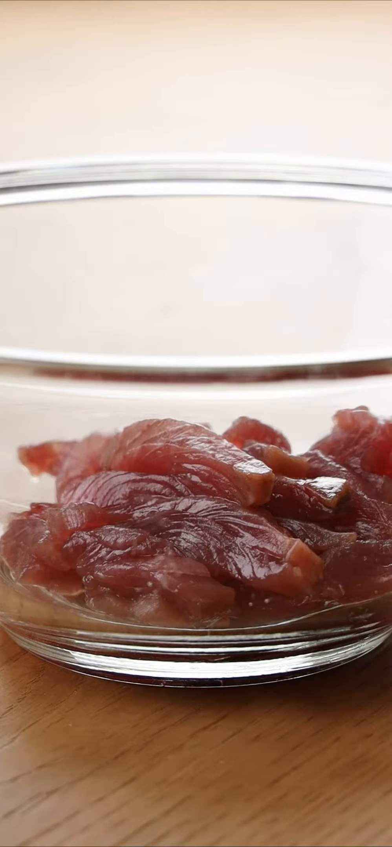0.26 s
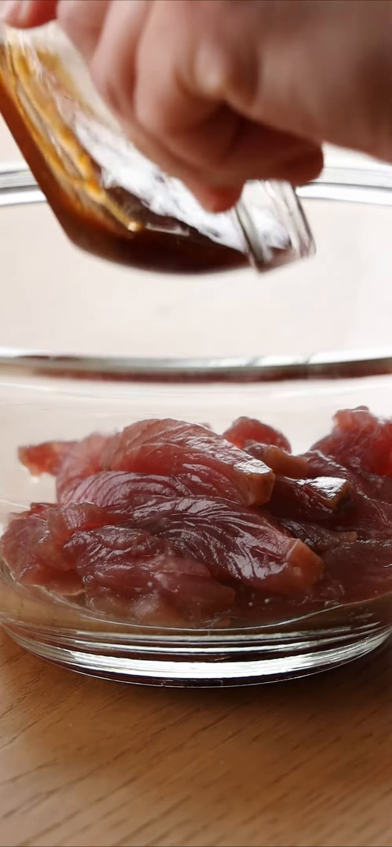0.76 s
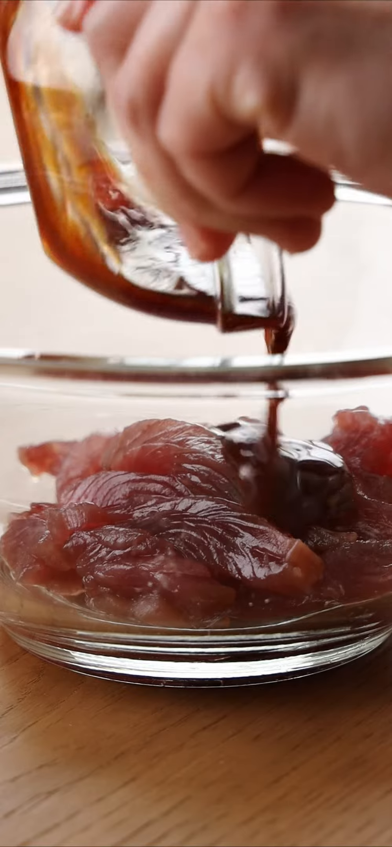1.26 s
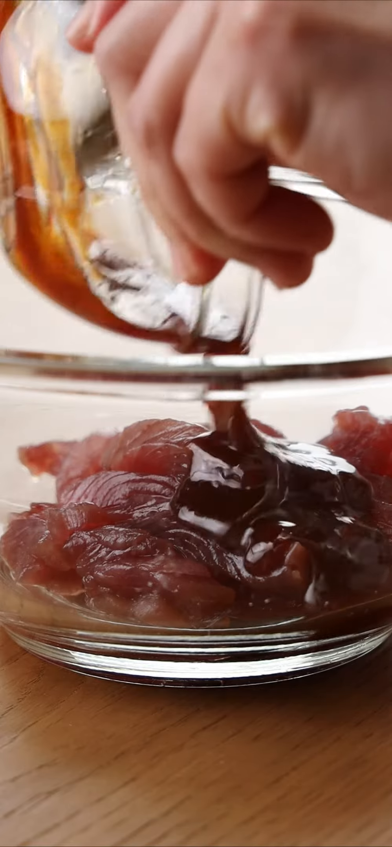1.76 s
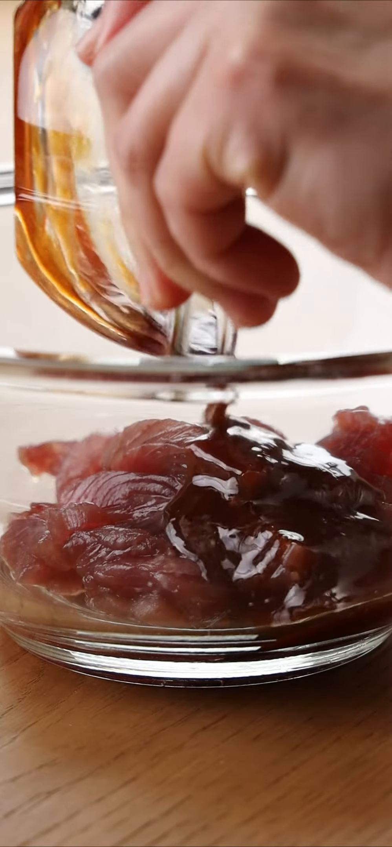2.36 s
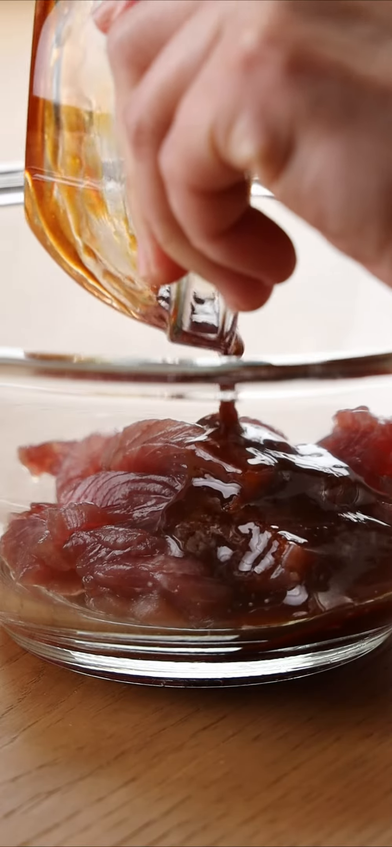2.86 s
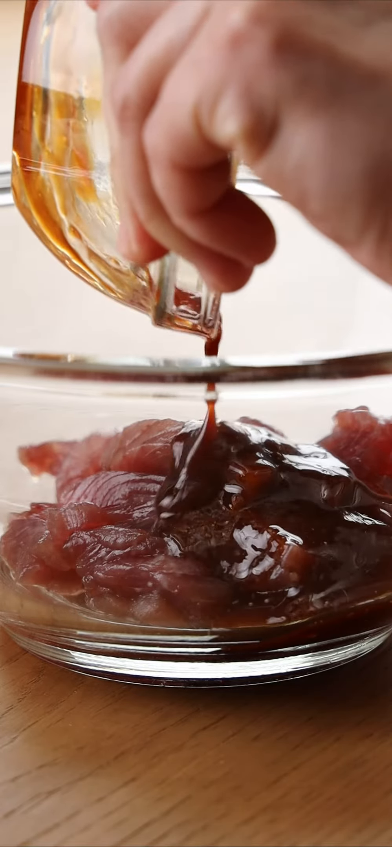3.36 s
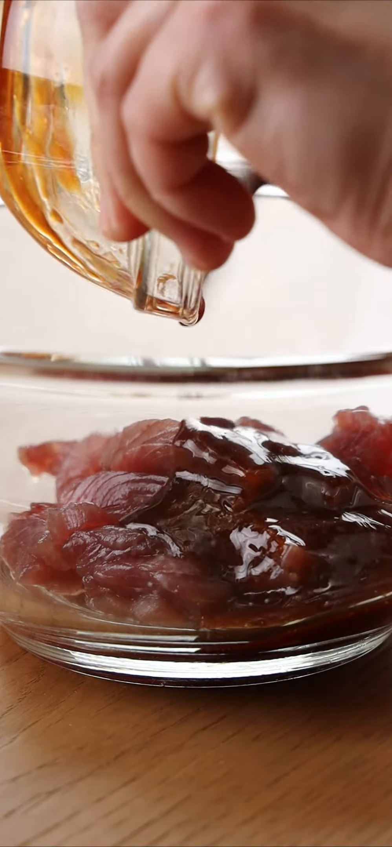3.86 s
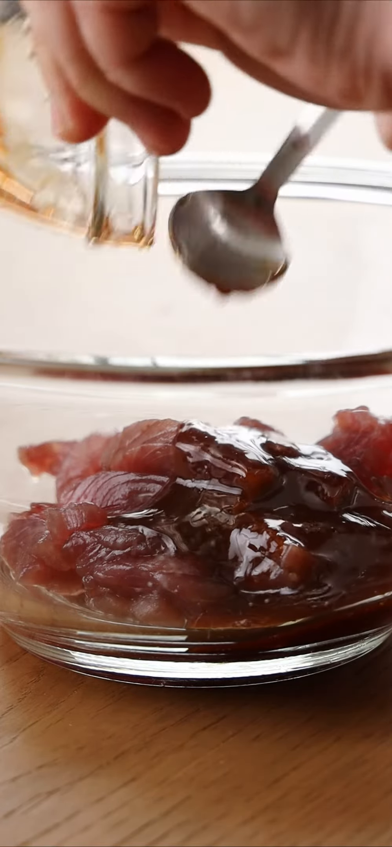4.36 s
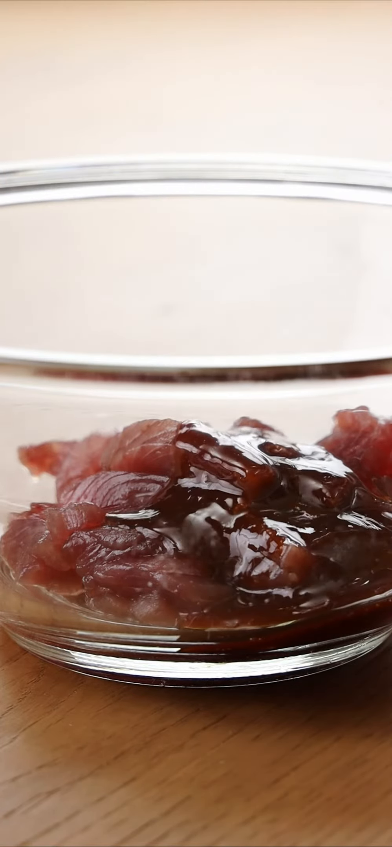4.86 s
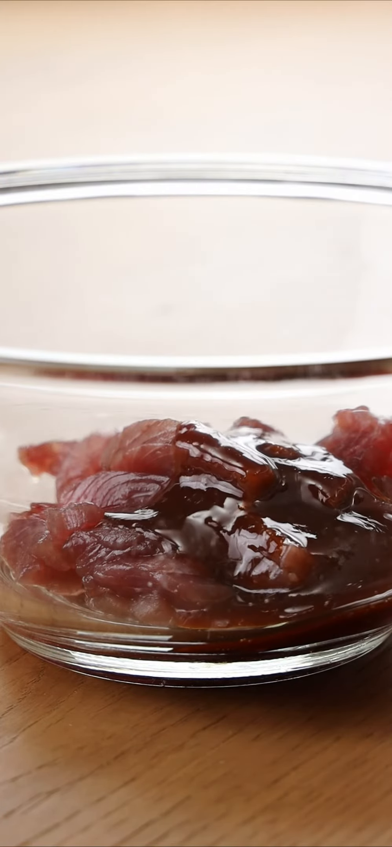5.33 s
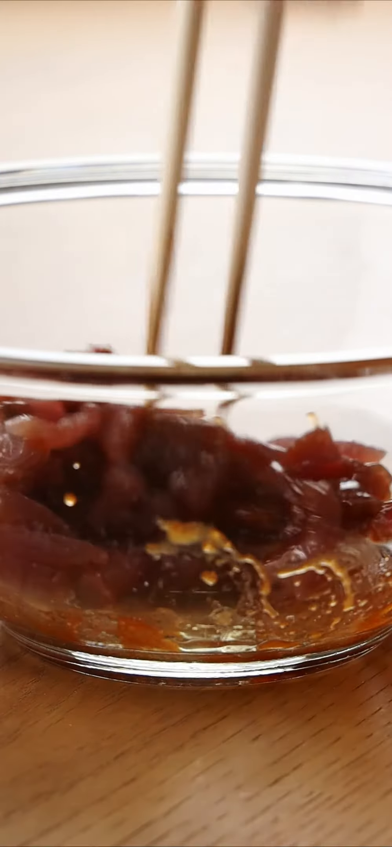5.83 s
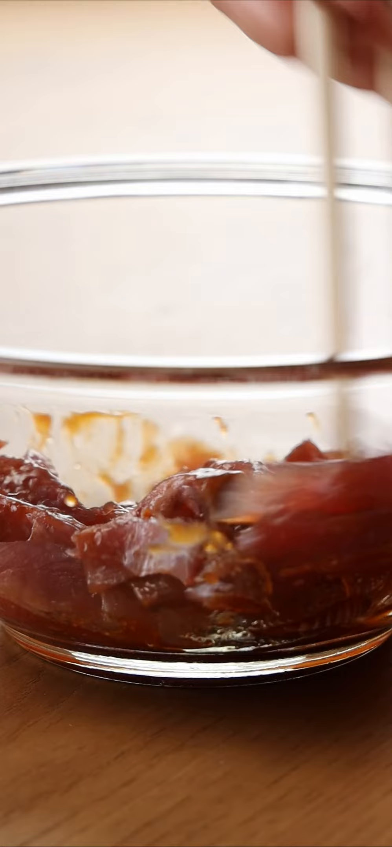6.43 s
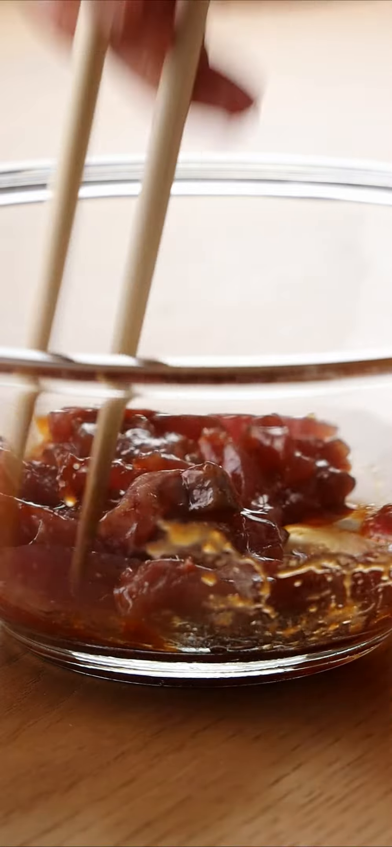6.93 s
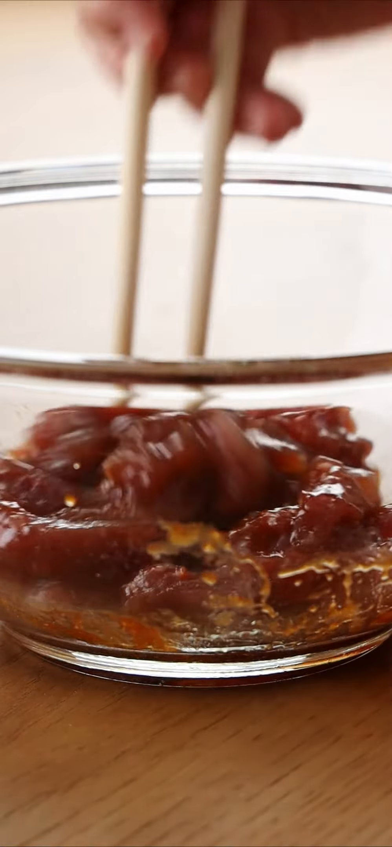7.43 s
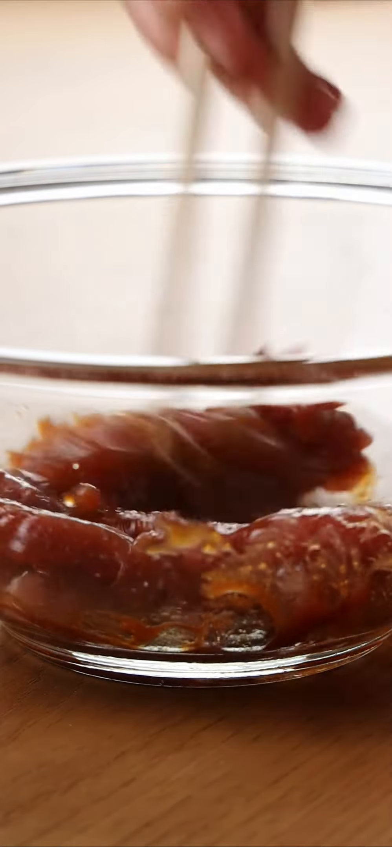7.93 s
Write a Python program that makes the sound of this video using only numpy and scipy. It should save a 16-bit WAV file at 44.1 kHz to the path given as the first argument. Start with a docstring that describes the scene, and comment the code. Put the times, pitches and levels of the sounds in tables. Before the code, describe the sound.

Metal spoon ticks and scrapes inside a small glass cup, clinks brightly on its lip, then chopsticks stir wet, sticky meat in a quiet kitchen.

```python
"""A steel spoon scrapes sauce out of a small glass cup over a glass bowl of raw meat: light ticks inside the
cup, hard clinks on its lip, a squeak and a last rattle, all built from decaying modes and a noise crack.
Chopsticks then stir the meat: the same recipe taps the bowl, and short decaying sines make the wet pops.
The microphone is close; a quiet kitchen answers with decaying noise, over steady ventilation noise and hum."""
import sys
import numpy as np
from scipy import signal
from scipy.fft import rfft, irfft, next_fast_len
from scipy.io import wavfile
from scipy.ndimage import uniform_filter1d, map_coordinates

SR = 44100
rng = np.random.default_rng(int(sys.argv[2]) if len(sys.argv) > 2 else 0)


def waveform_to_disk(signal):
    """Save audio, clipped to [-1, 1], as 16-bit WAV at the path in sys.argv[1]."""
    frames = np.transpose(np.atleast_2d(signal))
    scaled = np.clip(frames, -1, 1) * 32767
    samples = np.round(scaled).astype(np.int16)
    wavfile.write(sys.argv[1], SR, samples)


N = 361179  # length in samples

# Steady moving air. Each row: frequency in Hz, relative spectrum level in dB.
AIR_SPECTRUM = [(18, -69), (30, -36.5), (131, -15.5), (204, -9.5), (239, -10.5), (266, -3), (319, -10),
                (404, -3.5), (1160, -5), (1630, -18), (2010, -17.5), (2680, -19.5), (5900, -33),
                (12300, -42.5), (16000, -56)]
# Motor hum and whine. Each row: frequency in Hz, mean level in dB.
MOTOR_LINES = [(85, -89.5), (136, -81.5), (277, -79), (404, -90), (614, -72.5), (711, -76), (2024, -83.5),
               (3370, -84)]
# Spoon inside the cup. Each row: start in seconds, level in dB, hardness in dB, favoured ring in Hz.
CUP_TICKS = [(0.2821, -38.5, -5.5, 3330), (0.6201, -34, 0, 5400), (0.7092, -51, -16, 3160),
             (0.8738, -36.5, 1.5, 5000), (0.9954, -43.5, -22, 3750), (1.1034, -37.5, 2, 5100),
             (1.2602, -57, -14, 2540), (1.3327, -42, -11, 2540), (1.3551, -32.5, -9, 3420),
             (1.4607, -34, -4, 3270), (1.5395, -30, -7, 1620), (1.6866, -37.5, -8.5, 1630),
             (1.8049, -42, -16, 3100), (2.046, -35.5, 4, 2830), (2.165, -38.5, -5, 2470),
             (2.5339, -36.5, 8.5, 5230), (4.9063, -35, 9, 5800), (4.925, -48, -5, 2300)]
# Dull handling bumps. Each row: start in seconds, length in seconds, pitch in Hz, level in dB.
HANDLING_BUMPS = [(2.45, 0.067, 300, -59), (4.117, 0.14, 232, -64.5)]
# Spoon on the cup's lip. Each row: start in seconds, level in dB, hardness in dB, favoured ring in Hz.
LIP_CLINKS = [(2.7434, -35, -5, 1820), (3.0105, -29.5, -8.5, 4000), (3.0247, -48, 2, 3770),
              (3.0873, -19.5, -4.5, 3790), (3.2301, -23, 1.5, 3930), (3.2877, -17, -2.5, 3780),
              (3.4362, -28, 2, 4490), (3.4829, -25.5, 2, 3650), (3.6939, -24, 6.5, 4300),
              (3.7042, -25, 0.5, 4130), (3.8122, -40, -8, 4050), (3.8909, -20, 1, 3890),
              (4.3082, -27, 2.5, 4280), (4.4983, -39.5, -2, 2310)]
# Spoon ringing freely once let go. Each row: frequency in Hz, relative level in dB, 60 dB decay in seconds.
LOOSE_MODES = [(6272, -59, .5), (6923, -57, .33), (7267, -61, .3), (10180, -68, .35), (12560, -65, .32),
               (13220, -58, .2), (15700, -57, .09)]
# Short dry scrapes. Each row: start in seconds, length in seconds, drive level in dB before colouring.
DRY_SCRAPES = [(5.589, 0.029, -60), (5.626, 0.013, -42.5), (5.633, 0.018, -52.5)]
# Chopsticks on the bowl. Each row: start in seconds, level in dB, hardness in dB, favoured ring in Hz.
BOWL_TAPS = [(5.7126, -62, -23.5, 780), (6.0526, -50.5, 4, 5300), (6.5274, -55.5, -3, 2013),
             (7.0111, -51.5, -4, 2700), (7.3876, -49.5, 3, 5200), (7.3935, -47, 4, 3260),
             (7.4195, -52, 2, 3300)]
# The loudest films of sauce snapping. Each row: start in seconds, level in dB, pitch in Hz.
SAUCE_POPS = [(5.8255, -47, 1540), (5.939, -48, 2200), (6.2273, -31.5, 3280), (6.2345, -39.5, 2060),
              (6.284, -42.5, 4370), (6.4084, -54, 5160), (6.6662, -42, 4500), (6.6727, -36, 3515),
              (6.6924, -43, 4760), (6.7117, -37, 3480), (6.753, -40, 2950), (7.1729, -46, 1540),
              (7.185, -41.5, 4560), (7.263, -46.5, 2530), (7.4914, -35.5, 2830), (7.507, -39, 4540),
              (7.533, -33.5, 3220), (7.582, -43, 3430), (7.6177, -44, 5600), (7.7444, -47, 3370),
              (7.8273, -40.5, 2800), (7.913, -41, 2280), (7.9731, -37.5, 4470), (7.983, -43, 2460),
              (8.0185, -38.5, 2400)]
# Chopstick strokes through the meat. Each row: middle in seconds, crackle level in dB.
MEAT_STROKES = [(5.88, -59), (6.249, -54), (6.72, -52), (7.2, -64), (7.6, -49), (7.94, -50.5)]

# Modes of the spoon pressed into the cup, the hand-held cup and the loaded bowl.
# Each row: frequency in Hz, relative level in dB, 60 dB decay in seconds.
SPOON_MODES = [(1155, -13, 0.012), (1610, 1, 0.014), (2466, -4.5, 0.016), (2700, 0, 0.017),
               (3216, -6, 0.022), (4080, -5, 0.015), (4330, -5.5, 0.016), (4990, -11, 0.022),
               (5070, -14, 0.028), (5120, -16, 0.021), (6420, -5, 0.024), (7080, -9, 0.036),
               (7300, -20, 0.034), (10420, -11, .028), (10340, -5, 0.02), (10960, -11, 0.037),
               (12700, -11, .03), (13600, -11, .032), (14500, -19, .02), (15500, -16, 0.025)]
CUP_MODES = [(1700, -8, 0.027), (1790, -3.5, .028), (2087, -10.5, 0.012), (2655, -17, 0.02),
             (3190, -10.5, 0.02), (3325, -8.5, 0.02), (4003, -6.5, 0.035), (4133, -8.5, .025),
             (4280, -7, 0.019), (4590, -13, .018), (4880, -9, .014), (5330, -14, .014), (6660, -15.5, .03),
             (6860, -9, 0.04), (6990, -8, 0.062), (7130, -11.5, 0.087), (10050, -21, 0.038),
             (10690, -13, .05), (10810, -19.5, 0.053), (13030, -29.5, .04), (14650, -23.5, .03),
             (14900, -22.5, .035)]
BOWL_MODES = [(757, -13, .2), (2013, -14.5, .35), (2850, -3, .04), (2960, -5, .05), (3747, -6, .08),
              (4420, -12, .05), (4867, -12, .06), (5770, -11, .08), (5916, -12, .08), (6420, -16, .06),
              (7101, -19, .07), (8060, -15, .07), (10500, -18, .09), (11500, -25, .05)]

# Edges of the knock, body, chime and sizzle bands, in Hz.
CONTACT_BANDS = [600, 2400, 6000, 8500, 16000]
# Colour of each kind of contact. Columns: knock, body, chime, sizzle.
# The first of each pair is the usual band level in dB, the second the dB gained per dB of hardness.
TICK_COLOUR = (-7, 0, -15.5, -19.5)
TICK_HARDNESS = (0.12, 0.06, 0.15, 0.67)
CLINK_COLOUR = (-7, 0, -9.5, -22)
CLINK_HARDNESS = (0.26, 0.043, 0.94, 0)
TAP_COLOUR = (-4.5, 1, -14.5, -19.5)
TAP_HARDNESS = (-0.65, -0.028, 0.97, 0.98)

# Decay of the kitchen. Each row: frequency in Hz, 60 dB decay in seconds.
KITCHEN_DECAY = [(300, 0.74), (1500, 0.49), (4000, 0.48), (7000, 0.48), (15000, .27)]
# Colour of the kitchen's answer. Each row: frequency in Hz, gain in dB.
WALL_COLOUR = [(300, 1), (1500, 1), (4000, -1.5), (7000, 3.5), (15000, -2)]
# Rasp of the scrapes, then of the sliding stem. Each row: frequency in Hz, relative gain in dB.
SCRAPE_RASP = [(300, -25), (800, 5), (1400, 7.0), (2400, 0.0), (4500, 1), (6000, -13.0), (8000, -34.0),
               (14000, -45.5)]
SLIDE_RASP = [(500, -30), (1600, 7.5), (5000, 2), (9000, -27)]


def amp(db):
    """Decibels to gain."""
    return 10 ** (np.asarray(db) / 20)


def unit(x):
    """Scale x to an rms of 1."""
    return x / np.sqrt(np.mean(x ** 2) + 1e-20)


def along(points, hz):
    """Read a curve of (Hz, value) points on a log frequency axis."""
    f, v = np.transpose(points)
    return np.interp(np.log(hz + 1), np.log(f + 1), v)


def clock(seconds):
    """Sample times of a stretch, in seconds."""
    return np.arange(int(seconds * SR)) / SR


def add(track, s, x):
    """Mix x into the track at s seconds, cut off at the track's end."""
    part = track[round(s * SR):][:len(x)]
    part += x[:len(part)]


def filtered(x, gain):
    """Weigh x by a gain curve over frequency, without shifting phase."""
    size = next_fast_len(len(x) + SR // 10)
    hz = np.fft.rfftfreq(size, 1 / SR)
    return irfft(rfft(x, size) * gain(hz), size)[:len(x)]


def coloured(x, gain):
    """Filter x causally (minimum phase), with the gain given on x's own frequency grid."""
    cepstrum = irfft(np.log(gain))
    fold = 1 + np.sign(len(x) / 2 - np.arange(len(x)))
    fold[0] = 1
    return irfft(rfft(x) * np.exp(rfft(cepstrum * fold)))


def even(x):
    """Give x the same energy at every frequency, nearly keeping its outline in time."""
    phase = np.angle(rfft(x))
    return irfft(np.exp(1j * phase), len(x)) * np.linalg.norm(x)


def wobble(rate):
    """A smooth random curve with the given number of knots a second."""
    steps = np.arange(0, N + 64, 64)
    knots = rng.standard_normal(int(N * rate / SR) + 4)
    coarse = map_coordinates(knots, [steps * rate / SR])
    return np.interp(np.arange(N), steps, coarse)


def kitchen(x, gap=.004, early=0.88, early_life=0.014):
    """The room's answer: noise that starts after a gap, stronger early on, whose treble dies first."""
    hz, t, z = signal.stft(rng.standard_normal(SR // 2), SR, nperseg=256)
    decay = amp(-60 * t / along(KITCHEN_DECAY, hz)[:, None])
    z = z * decay * (1 + early * np.exp(-t / early_life))
    norm = np.linalg.norm(signal.istft(z)[1])
    tail = signal.istft(z * amp(along(WALL_COLOUR, hz))[:, None])[1] / norm
    return signal.fftconvolve(x, np.pad(tail, (int(gap * SR), 0)))


def strike(modes, crack_db, crack_s, soft_hz, scatter_db, spread, count=8):
    """One contact: ringing modes and a noise crack, repeated within milliseconds by chatter and the walls."""
    t = np.arange(2 ** 13) / SR
    hz, db, t60 = np.transpose(modes)[:, :, None]
    size, detune = rng.standard_normal((2, len(modes), 1))
    polarity = rng.choice([-1, 1], hz.shape)
    swing = polarity * np.sin(2 * np.pi * hz * (1 + .002 * detune) * t)
    ring = np.sum(amp(db + 1.2 * size - 60 * t / t60) * swing, axis=0)

    fade = amp(-30 * t / crack_s)  # used three times over: the crack falls about 90 dB in crack_s
    crack = amp(crack_db) * fade * even(fade ** 2 * rng.standard_normal(len(t)))
    softener = signal.butter(2, min(soft_hz, SR / 3), fs=SR)  # a longer contact gives a duller crack
    ring += signal.lfilter(*softener, crack)

    delays = (rng.uniform(.1, 1, count) * spread * SR).astype(int)
    echoes = np.bincount(delays, amp(scatter_db) * rng.choice([-1, 1], count))
    echoes[0] += 1  # the contact itself
    return signal.fftconvolve(ring, even(echoes))[:len(t)]


def voiced(x, band_db, ring_hz, favour_db, low_hz):
    """Place and hardness of a contact favour one ring and set the strength of knock, body, chime and sizzle."""
    hz = np.fft.rfftfreq(len(x), 1 / SR)
    small_body = 1e-4 + 1 / np.sqrt(1 + (low_hz / (hz + 1)) ** 6)  # small things radiate little bass
    favour = amp(favour_db / (1 + ((hz - ring_hz) / 260) ** 2))
    x = coloured(x, small_body * favour)

    attack = SR // 100  # bands are levelled over the first 10 ms
    power = 2 * np.abs(rfft(x[:attack], len(x))) ** 2 / (len(x) * attack)
    natural_db = 10 * np.log10(np.histogram(hz, CONTACT_BANDS, weights=power)[0])
    lift_db = (band_db - natural_db)[np.digitize(hz, CONTACT_BANDS[1:-1])]
    return coloured(x, amp(uniform_filter1d(lift_db, size=120)))  # smooth steps between bands


def contacts(table, blow, colour_db, harder, room_db, favour_db, low_hz):
    """Play contacts of one kind: hardness tilts their bands, and the room answers each one anew."""
    out = np.zeros(N)
    for s, db, hard_db, ring_hz in table:
        band_db = db + np.array(colour_db) + hard_db * np.array(harder)
        if ring_hz < CONTACT_BANDS[1]:
            band_db[0] += 7  # dB of extra knock when the favoured ring is deep
        hit = voiced(blow(), band_db, ring_hz, favour_db, low_hz)
        add(out, s, hit)
        add(out, s, amp(room_db) * kitchen(hit))
    return out


def ventilation(air_db=-59):
    """Steady moving air as shaped noise, with unsteady motor lines, the high ones the most blurred."""
    t = np.arange(N) / SR
    air = unit(filtered(rng.standard_normal(N), lambda hz: amp(along(AIR_SPECTRUM, hz))))
    out = amp(air_db + 0.11 * wobble(3)) * air
    for hz, db in MOTOR_LINES:
        blur = np.sqrt(hz / 200) * wobble(14)  # phase drift, radians
        line = np.sqrt(2) * np.sin(2 * np.pi * hz * t + blur)
        out += amp(db + 2 * wobble(5)) * line
    return out


def spoon_in_cup(table):
    """Ticks of a spoon pressed into the cup: its many modes are damped within hundredths of a second."""
    def tick():
        return strike(SPOON_MODES, crack_db=14.5, crack_s=0.0083, soft_hz=7140, scatter_db=-10, spread=.0027)
    return contacts(table, tick, TICK_COLOUR, TICK_HARDNESS, room_db=-8.5, favour_db=7.5, low_hz=990)


def whine(start=.72, length=0.14, pitch_hz=555):
    """A faint, brief tone with its octave, quick to rise and slow to fade."""
    out, t = np.zeros(N), clock(length)
    turn = 2 * np.pi * pitch_hz * t
    swell = np.minimum(t / 0.015, 1) * np.sqrt(1 - t / length)
    add(out, start, swell * (amp(-53) * np.sin(turn) + amp(-60) * np.sin(2 * turn)))
    return out


def bumps():
    """Dull handling bumps: narrow bands of low noise that swell and fade."""
    out = np.zeros(N)
    for s, length, pitch_hz, db in HANDLING_BUMPS:
        noise = rng.standard_normal(len(clock(length)))
        thud = filtered(noise, lambda hz: np.exp(-((hz - pitch_hz) / 90) ** 2))
        add(out, s, amp(db) * unit(thud * np.hanning(len(thud))))
    return out


def spoon_on_lip():
    """Clinks on the lip: the struck glass of the hand-held cup rings on its own modes."""
    def clink():
        return strike(CUP_MODES, crack_db=5.5, crack_s=0.01, soft_hz=6200, scatter_db=-12.5, spread=0.0016)
    return contacts(LIP_CLINKS, clink, CLINK_COLOUR, CLINK_HARDNESS, room_db=-10.0, favour_db=6.0, low_hz=950)


def slide(start=4.351, length=0.021, ring_hz=4080, width_hz=130, level_db=-34.0, rasp_db=-27, room_db=-10):
    """The spoon's stem slides over the lip and briefly rubs one ring of the cup into a squeak."""
    out, t = np.zeros(N), clock(length)

    def squeak(hz):
        return amp(rasp_db + along(SLIDE_RASP, hz)) + np.exp(-((hz - ring_hz) / width_hz) ** 2)

    noise = filtered(rng.standard_normal(len(t)), squeak)
    rub = amp(level_db) * unit(noise * np.sin(np.pi * t / length))
    add(out, start, rub)
    add(out, start, amp(room_db) * kitchen(rub))
    return out


def rattle(start=5.0404, level_db=-37, ring_hz=3500, count=4):
    """The spoon rattles to rest in the cup: bounces that come ever sooner, weaker and softer."""
    flights = .0095 * .88 ** np.arange(count)  # seconds in the air, each .88 of the last
    loss_db = 2.1  # per bounce, off both level and hardness
    bounces = [(start + flights[:k].sum(), level_db - loss_db * k, -loss_db * k, ring_hz)
               for k in range(count)]
    return spoon_in_cup(bounces)


def let_go(start=5.047, level_db=-9, room_db=4):
    """No longer damped by the fingers, the spoon sings on briefly as the cup is put down further away."""
    out, t = np.zeros(N), clock(.5)
    ring = sum(amp(level_db + db - 60 * t / t60) * np.sin(2 * np.pi * hz * t) for hz, db, t60 in LOOSE_MODES)
    add(out, start, ring)
    add(out, start, amp(room_db) * kitchen(ring))  # more room than direct sound
    return out


def scrapes():
    """Short dry scrapes as the utensils are handled: bursts of spiky noise, coloured by a rasp."""
    out = np.zeros(N)
    for s, length, db in DRY_SCRAPES:
        add(out, s, amp(db) * rng.laplace(size=len(clock(length))))
    return filtered(out, lambda hz: amp(along(SCRAPE_RASP, hz)))


def chopsticks():
    """Wooden tips knock on the bowl, which rings softly under the meat."""
    def tap():
        return strike(BOWL_MODES, crack_db=16.0, crack_s=0.0074, soft_hz=7840, scatter_db=-8.5, spread=0.0018)
    return contacts(BOWL_TAPS, tap, TAP_COLOUR, TAP_HARDNESS, room_db=-11.0, favour_db=9.5, low_hz=500)


def pop(hz, cycles, opening):
    """A film of sauce opens within a fraction of a cycle and rings a tiny cavity."""
    turns = hz * clock(.015)
    return np.sin(2 * np.pi * turns) * np.exp(-turns / cycles) * (1 - np.exp(-turns / opening))


def meat(count=40):
    """Wet pops over a fine crackle of random tiny pops that gather around the middle of each stroke."""
    out = np.zeros(N)
    for s, db, hz in SAUCE_POPS:
        add(out, s, amp(db) * pop(hz, cycles=3.8, opening=0.05))
    for s, db in MEAT_STROKES:
        for offset, size, pitch in rng.standard_normal((count, 3)):
            hz = min(3520 * 2 ** (0.59 * pitch), SR / 3)  # scatter of 0.59 octaves
            grain_db = db - 2.5 * abs(offset) + 4 * size  # weaker far from the middle
            add(out, s + .07 * offset, amp(grain_db) * pop(hz, cycles=2.5, opening=0.77))
    return out + amp(-12.5) * kitchen(out)[:N]


def scene():
    """Everything at one close microphone."""
    spoon = spoon_in_cup(CUP_TICKS) + spoon_on_lip() + slide() + rattle() + let_go()
    stirring = chopsticks() + meat()
    background = ventilation() + whine() + bumps() + scrapes()
    return (spoon + stirring + background)[None]


def record(dry, top_hz=16300):
    """The recorder keeps nothing above its band limit, reached over a 700 Hz slope."""
    def edge(hz):
        return np.clip((top_hz - hz) / 700 + .5, 0, 1) ** 2
    return np.array([filtered(channel, edge) for channel in dry])


dry = scene()
out = record(dry)
waveform_to_disk(out)
```